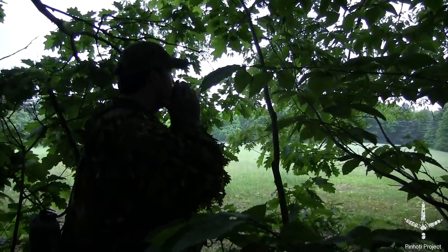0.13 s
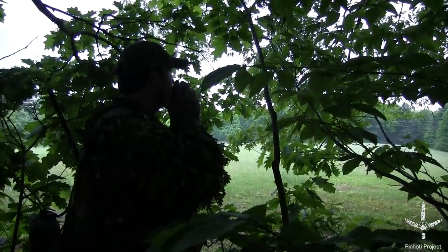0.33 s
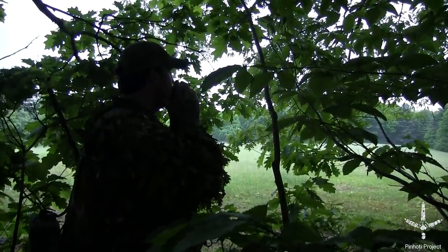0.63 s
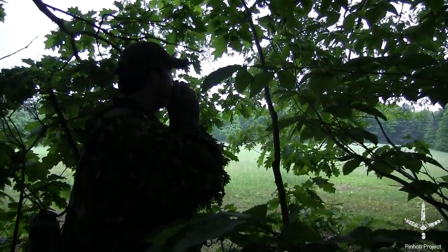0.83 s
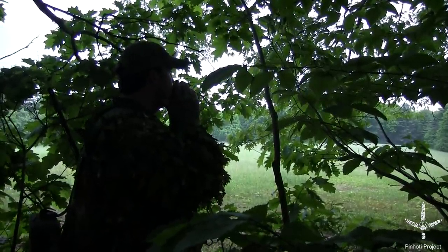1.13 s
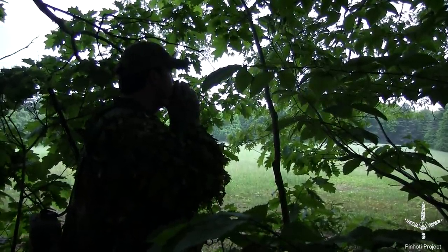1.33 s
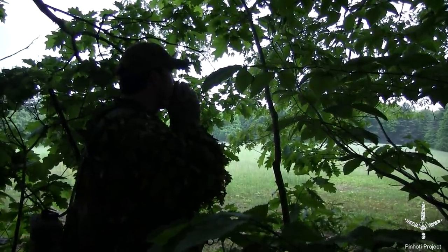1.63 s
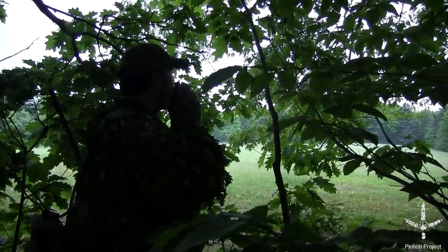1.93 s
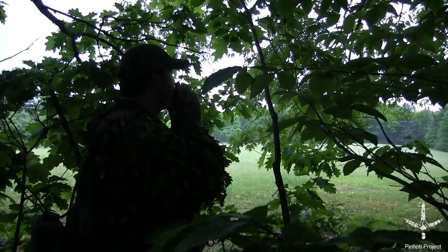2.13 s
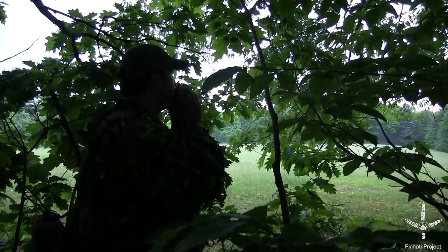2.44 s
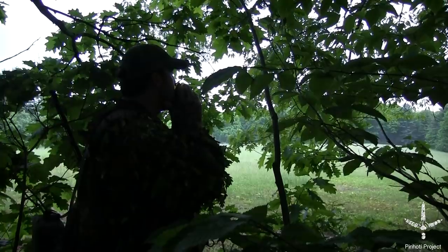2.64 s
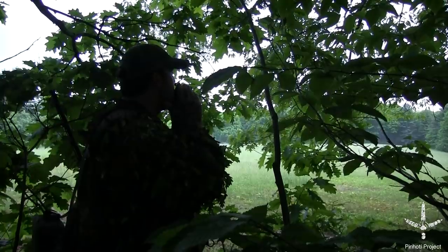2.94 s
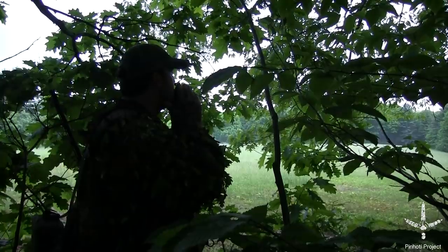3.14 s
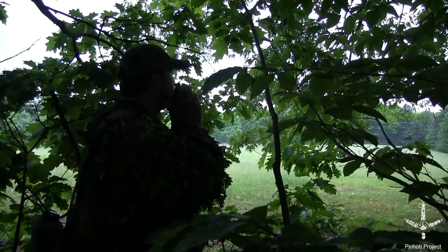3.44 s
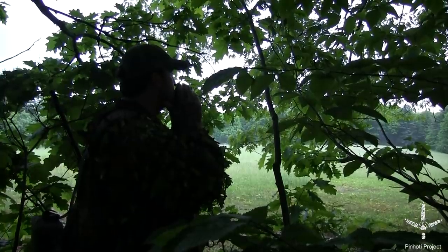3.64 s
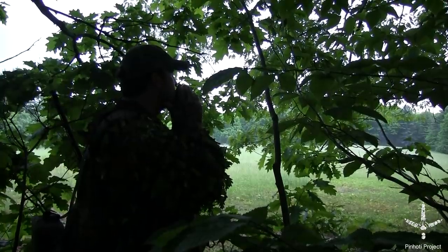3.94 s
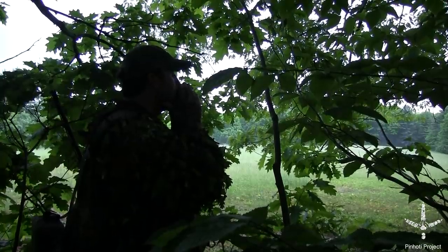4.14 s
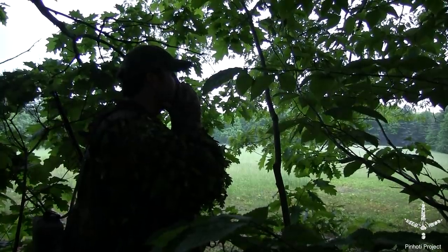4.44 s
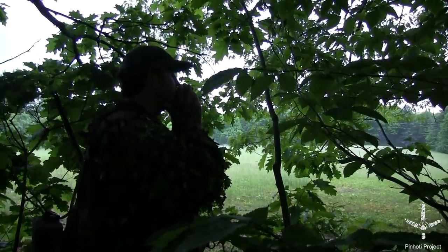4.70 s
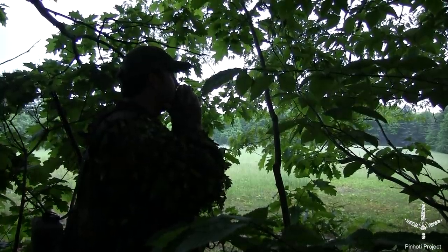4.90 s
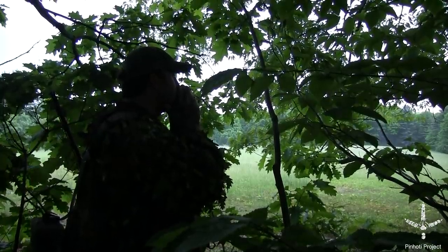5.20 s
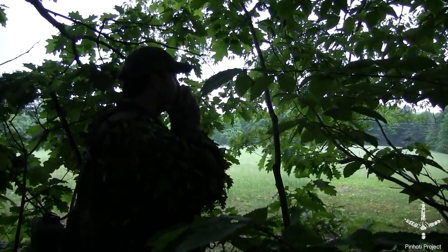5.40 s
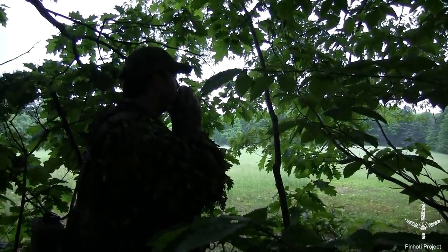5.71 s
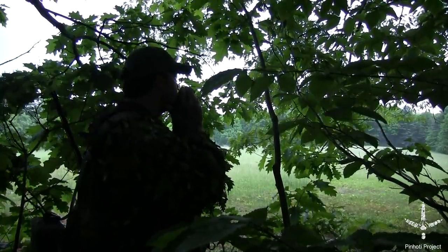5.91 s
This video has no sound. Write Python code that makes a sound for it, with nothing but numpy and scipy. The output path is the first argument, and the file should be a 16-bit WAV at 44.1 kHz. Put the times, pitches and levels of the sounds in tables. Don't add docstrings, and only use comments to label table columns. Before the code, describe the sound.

Dawn birdsong in echoing woods: slurred whistles, steady high trilling, four far harsh caws, then two sharp hollow clucks near the microphone.

```python
import sys
import numpy as np
from scipy import signal
from scipy.fft import rfft, irfft, next_fast_len
from scipy.io import wavfile
from scipy.ndimage import uniform_filter1d, map_coordinates

SR = 44100
rng = np.random.default_rng(int(sys.argv[2]) if len(sys.argv) > 2 else 0)


def nominal_scale(level):
    x = np.asarray(level, float) / 20
    return 10 ** x


def unload_audio(sound):
    columns = np.transpose(np.atleast_2d(sound))
    steps = np.round(np.clip(columns, -1, 1) * 32767)
    wavfile.write(sys.argv[1], SR, steps.astype(np.int16))


N = 267246
T = np.arange(N) / SR


def unit(x):
    return x / np.sqrt(np.mean(x ** 2) + 1e-20)


def along(points, hz):
    f, v = np.transpose(points)
    return np.interp(np.log(hz + 1), np.log(f + 1), v)


def wobble(rate):
    return map_coordinates(rng.standard_normal(int(N * rate / SR) + 4), [T * rate])


def coloured(x, points):
    m = next_fast_len(N + 8192)
    return irfft(rfft(x, m) * nominal_scale(along(points, np.fft.rfftfreq(m, 1 / SR))), m)[:N]


def late(x, delay_s):
    return np.pad(x, (int(delay_s * SR), 0))[:N]


def note(rows, fade, smooth):
    s, hz, db = np.transpose(rows)
    span = slice(max(0, int((s[0] - fade) * SR)), min(N, int((s[-1] + fade) * SR)))
    t = T[span]

    def soften(v):
        return uniform_filter1d(np.interp(t, s, v), max(1, int(smooth * SR)), mode="nearest")

    edge = np.clip(np.minimum(t - s[0], s[-1] - t) / fade + 1, 0, 1)
    pitch = soften(hz)
    phase = 2 * np.pi * np.cumsum(pitch) / SR
    return span, pitch, phase, np.sqrt(2) * nominal_scale(soften(db)) * edge ** 2


def woods(x, scale, delay):
    # f/Hz, t60/s
    decay = [(300, 0.8), (1200, 2.3), (3000, 0.75), (6000, 0.87), (12000, 0.64)]
    hz, t, z = signal.stft(rng.standard_normal(2 * SR), SR, nperseg=256)
    t60 = scale * along(decay, hz)[:, None]
    tail = signal.istft(z * nominal_scale(-60 * t / t60), SR, nperseg=256)[1]
    tail = np.pad(tail / np.linalg.norm(tail), (int(delay * SR), 0))
    return signal.fftconvolve(x, tail)[:N]


def air():
    # f/Hz, level/dB per Hz
    hush = [(18, -44), (30, -17), (60, -16), (115, -0.5), (230, -6.5), (450, -11), (1000, -16.5),
            (2000, -17.5), (3500, -14), (5600, -16), (9000, -20), (15700, -26)]
    return nominal_scale(-52.5 + 0.18 * wobble(1.14)) * unit(coloured(rng.standard_normal(N), hush))


def thuds():
    # t/s, peak level/dB, f/Hz, t60/s
    knocks = [
        (1.395, -31, 128, .07),
        (1.422, -39, 112, .2),
        (1.455, -42, 115, .12),
        (4.33, -43, 110, .12),
    ]
    out = np.zeros(N)
    for s, db, hz, t60 in knocks:
        t = np.maximum(T - s, 0)
        onset = (1 - np.exp(-t / .002)) ** 2
        out += nominal_scale(db - 60 * t / t60 + 0.88 * wobble(40)) * onset * -np.sin(2 * np.pi * hz * t)
    return out


def song_haze():
    # t/s, level/dB
    swells = [(0, -65), (1.2, -70), (1.88, -66), (2.56, -60.5), (3.34, -65), (4.22, -57.5), (4.7, -61.5),
              (5.22, -56), (5.75, -65.5)]
    murmur_db, half_width_s = -70, 0.23
    dry = np.zeros(N)
    for centre_hz in (2900, 3390, 3840, 4180):
        hz = centre_hz * (1 + .08 * wobble(55))
        dry += nominal_scale(3 * wobble(9)) * np.sin(2 * np.pi * np.cumsum(hz) / SR)
    heard = nominal_scale(-22) * dry + woods(dry, scale=0.27, delay=.004)
    busy = nominal_scale(murmur_db) + sum(nominal_scale(db) * np.exp(-((T - s) / half_width_s) ** 2) for s, db in swells)
    return busy * unit(heard)


def chorus():
    # chirp rate/Hz, start f/Hz, end f/Hz, level/dB
    trillers = [
        (18.64, 5150, 4050, 6.5),
        (20.86, 5200, 4300, -1),
        (22.09, 5050, 4400, 0.5),
        (16.15, 4950, 4200, -5),
        (23.87, 5250, 4500, -0.5),
        (19.48, 5000, 4150, 2),
    ]
    # t/s, depth/dB
    lulls = [(1.25, 6), (3.69, 7.5), (4.49, 2), (4.75, 2.5), (5.06, 7), (5.4, 3.5)]
    onset_s, recover_s = 0.021, 0.048
    dry = np.zeros(N)
    for rate, start_hz, end_hz, db in trillers:
        beat = np.cumsum(rate * (1 + .04 * wobble(1.5))) / SR % 1
        share = np.clip(beat / .65, 0, 1)
        hz = (start_hz + (end_hz - start_hz) * share ** 1.1) * (1 + .012 * wobble(6))
        gain = np.sin(np.pi * share ** .7) * nominal_scale(db + 2.5 * wobble(9) + 3 * wobble(60))
        dry += gain * np.sin(2 * np.pi * np.cumsum(hz) / SR)
    heard = nominal_scale(-3) * dry + woods(dry, scale=1.0, delay=.004)
    lull_db = np.zeros(N)
    for s, db in lulls:
        lull_db += db * np.exp(np.where(T < s, (T - s) / onset_s, (s - T) / recover_s))
    return nominal_scale(-51.5 + 1.2 - lull_db) * unit(heard)


def crow():
    # t/s, length/s, f/Hz, level/dB
    caws = [
        (0.872, .21, 660.4, -45.5),
        (1.308, 0.19, 672.6, -45),
        (1.79, .21, 626, -46.5),
        (2.269, 0.24, 650, -46.5),
    ]
    # share of its length, pitch ratio, level/dB
    arch = [
        (0, .82, -9),
        (.12, .93, -2),
        (.3, 1.0, 0),
        (.55, .96, -5),
        (1, .86, -11),
    ]
    # f/Hz, level/dB
    beak = [(450, -55), (650, -18.5), (950, -17), (1150, -8.5), (1300, -1), (1550, -1.5), (1900, -14),
            (2300, -21.5), (3500, -14.5), (6000, -53)]
    dry = np.zeros(N)
    unsteady, rasp = .6 * wobble(70), wobble(120)
    breath = rng.standard_normal(N)
    for start, length, pitch_hz, db in caws:
        rows = [(start + share * length, pitch_hz * ratio, db + shape_db) for share, ratio, shape_db in arch]
        span, hz, phase, gain = note(rows, fade=.012, smooth=0.0078)
        phase = phase + unsteady[span]
        pulses = sum(np.cos(k * phase) for k in range(1, 7))
        puffs = 1.8 * breath[span] * (1 + np.cos(phase))
        dry[span] += gain * nominal_scale(3 * rasp[span]) * (pulses + puffs)
    dry = coloured(dry, beak)
    return nominal_scale(1) * dry + nominal_scale(-3) * woods(dry, scale=.12, delay=.005) + nominal_scale(-3) * woods(dry, scale=1.1, delay=.03)


def phrases(slurs):
    # f/Hz, level/dB
    registers = [(2300, -2), (2600, -9.5), (2850, 2.5), (3080, -7), (3250, 2.5), (3480, -2), (3750, 4.5),
                 (4700, 1)]
    rounding, legato_s = .55, .004
    breath_s, breath_db = 0.015, 2
    share = np.linspace(.04, .96, 9)
    joined, last_end = [], -1
    for s, length, from_hz, to_hz, db in sorted(slurs):
        bent = share ** (0.88 if to_hz < from_hz else 1.25)
        eased = rounding * (1 - np.cos(np.pi * bent)) / 2 + (1 - rounding) * bent
        hz = from_hz + (to_hz - from_hz) * eased
        steep_fall = from_hz > 1.05 * to_hz
        fade_db = 4 * (share - .5) * steep_fall
        if s > last_end + legato_s:
            joined.append([])
        joined[-1] += list(zip(s + share * length, hz, db + along(registers, hz) - fade_db))
        last_end = s + length
    out = []
    for rows in map(sorted, joined):
        first, last = rows[0][0], rows[-1][0]
        out.append([(s, hz, db - breath_db * max(0, 1 - min(s - first, last - s) / breath_s))
                    for s, hz, db in rows])
    return out


def songbird():
    # t/s, length/s, from f/Hz, to f/Hz, level/dB
    falls = [(.69, 0.031, 4300, 2930, -55), (.792, 0.01, 4900, 3970, -47), (.843, .024, 3330, 2374, -46),
             (.914, .014, 3140, 2360, -39.5), (1.66, 0.03, 4600, 3350, -51),
             (1.822, 0.02, 3420, 2670, -42.5), (1.886, 0.016, 3744, 2900, -38.5),
             (1.903, .024, 2900, 2550, -46.5), (2.52, 0.052, 3245, 2490, -42),
             (2.64, 0.053, 3280, 2490, -41), (3.27, 0.025, 4680, 4040, -47),
             (3.307, 0.031, 3260, 2870, -47), (3.37, 0.039, 3940, 2550, -45.5),
             (4.053, .015, 4280, 3140, -47), (4.08, .044, 3770, 2680, -42), (4.244, .023, 3505, 2335, -41),
             (4.32, 0.023, 3460, 2646, -44), (5.162, .012, 4500, 3900, -45), (5.2, 0.02, 3510, 2640, -46.5),
             (5.3, 0.03, 3780, 2740, -42), (6.016, .027, 3330, 2670, -47)]
    # t/s, length/s, from f/Hz, to f/Hz, level/dB
    rises = [(.724, 0.032, 2890, 4750, -48.5), (.868, 0.012, 2360, 2630, -50),
             (0.88, .018, 2646, 3156, -42.5), (1.723, 0.025, 3350, 4500, -45),
             (1.849, 0.035, 2630, 3730, -42), (1.931, .017, 2700, 3110, -48),
             (2.489, .027, 2980, 3240, -42), (2.61, .027, 2930, 3230, -44), (3.351, .014, 2910, 3940, -43),
             (4.068, .011, 3120, 3780, -43), (4.139, 0.011, 2720, 2850, -43),
             (4.16, 0.016, 2240, 2450, -50), (4.268, 0.024, 2350, 2668, -56.5),
             (4.294, 0.026, 2680, 3510, -40), (4.346, 0.025, 2655, 4120, -44.5),
             (5.117, 0.01, 4030, 4820, -49.5), (5.132, .02, 3710, 4480, -44),
             (5.222, 0.013, 2603, 2824, -43), (5.252, 0.014, 2843, 3730, -43.5)]
    # t/s, length/s, from f/Hz, to f/Hz, level/dB
    holds = [(0.901, 0.016, 3080, 3130, -36), (1.695, 0.031, 3300, 3390, -48.5),
             (1.948, .014, 3100, 3080, -38), (3.297, .005, 4040, 4100, -44), (3.34, 0.016, 2865, 2880, -42),
             (4.367, .012, 4070, 4120, -57), (5.238, .014, 2810, 2810, -45),
             (5.265, .037, 3710, 3720, -43.5), (5.919, .09, 3860, 3500, -49), (6.05, .01, 2900, 2900, -50)]
    # t/s, length/s, from f/Hz, to f/Hz, level/dB
    faint = [(.455, .035, 2910, 2660, -60), (3.17, 0.14, 3315, 3294, -64), (3.3, 0.14, 3290, 3300, -56.5),
             (3.855, .11, 3240, 3220, -58), (5.335, 0.038, 3740, 3660, -56),
             (5.58, 0.0296, 3110, 3330, -61), (5.69, .03, 3310, 3240, -61), (5.96, .08, 6400, 6340, -64)]
    dry, blurred = np.zeros((2, N))
    flutter, leaves = nominal_scale(1.35 * wobble(90)), 1.4 * wobble(60)
    for rows in phrases(falls + rises + holds) + phrases(faint):
        span, hz, phase, gain = note(rows, fade=.004, smooth=0.003)
        dry[span] += gain * flutter[span] * (np.sin(phase) + nominal_scale(-33) * np.sin(2 * phase))
        blurred[span] += gain * np.sin(phase + leaves[span])
    echo = late(dry, .066)
    ground = late(dry, .003)
    direct = nominal_scale(-0.5) * (dry + nominal_scale(-7) * ground)
    return direct + nominal_scale(-32) * echo + nominal_scale(-10) * woods(blurred, scale=0.53, delay=.03)


def cluck(snap, lead, held, rebound_hz, rebound_db):
    # t/s, f/Hz, level/dB
    low_note = [
        (-.012, 660, -21),
        (-.0108, 775, -12),
        (-.0075, 755, -11),
        (-.0045, 710, -11.5),
        (-.002, 900, -8.3),
    ]
    first, first_hz, first_db = low_note[0]
    flutter = [(first - lead, 580, -40), (first - lead + .0022, first_hz + 60, first_db)]
    high_hz, snap_db, shut_s = 1135, -4.8, .0028
    high = [(0, high_hz - 30, snap_db), (held, high_hz, snap_db - 2.4), (held + shut_s, 940, -26)]
    opens, peaks, ends = .0079, .0117, .0149
    opening_db = rebound_db + .9 * (rebound_db + 11)
    rebound = [(opens, .89 * rebound_hz, opening_db), (peaks, rebound_hz, rebound_db),
               (ends, rebound_hz, rebound_db - 18)]
    return [(snap + s, hz, db) for s, hz, db in flutter + low_note + high + rebound]


def reed_call():
    # snap t/s, lead-in/s, high note held/s, rebound f/Hz, rebound level/dB
    clucks = [
        (4.4487, .0053, .003, 1110, -16.5),
        (5.3869, .0023, .0017, 1360, -11.5),
    ]
    # f/Hz, level/dB
    tube = [(1000, -30), (1480, -21), (1800, -28), (2100, -24), (2350, -25), (2750, -48), (3450, -28),
            (3900, -28), (4300, -46), (9000, -60), (10500, -50), (12000, -70)]
    dry = np.zeros(N)
    for row in clucks:
        span, hz, phase, gain = note(cluck(*row), fade=.0015, smooth=.001)
        overtones = sum(nominal_scale(along(tube, k * hz)) * np.sin(k * phase + k) for k in range(2, 15))
        low = np.clip((950 - hz) / 120, .25, 1)
        leak = nominal_scale(-18) * low ** 2 * (np.sin(1.5 * phase) + .2 * np.sin(2.5 * phase))
        dry[span] += gain * (np.sin(phase) + leak + low * overtones)
    dry = coloured(dry, [(250, -14), (450, -3), (600, 0)])
    away = coloured(dry, [(600, -9), (800, -4.5), (1150, -1.5), (4000, 18)])
    near_leaves = nominal_scale(-23) * woods(away, scale=0.07, delay=0.011)
    return dry + near_leaves + nominal_scale(-34.0) * woods(away, scale=1.0, delay=.03)


def scene():
    return (air() + thuds() + song_haze() + chorus() + crow() + songbird() + reed_call())[None]


def roll_off(x):
    return signal.sosfilt(signal.butter(12, 15850, fs=SR, output="sos"), x)


def record(dry):
    # f/Hz, level/dB
    response = [(20, -24), (45, -9), (80, 0), (15780, 0), (15900, -70)]
    over = np.maximum(np.abs(dry) / .12 - 1, 0)
    recover = np.exp(-np.arange(SR // 4) / (.03 * SR))
    duck_db = 7 * signal.fftconvolve(over, recover[None] / recover.sum())[:, :N]
    mix = coloured((dry * nominal_scale(-duck_db))[0], response)[None]
    return roll_off(mix)


dry = scene()
out = record(dry)
unload_audio(out)
```